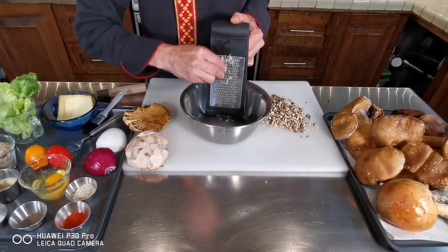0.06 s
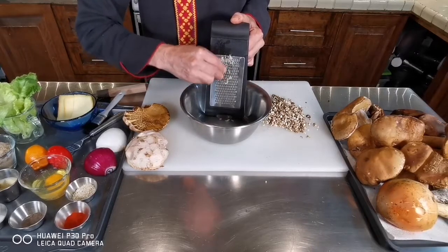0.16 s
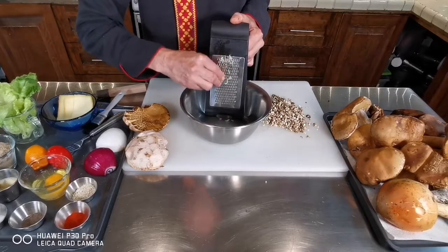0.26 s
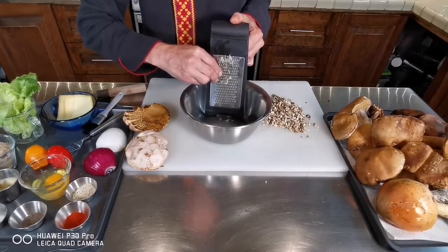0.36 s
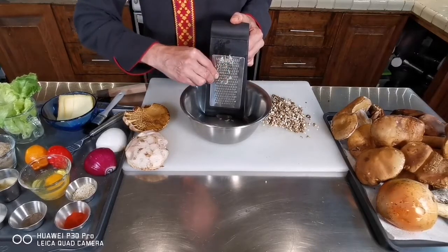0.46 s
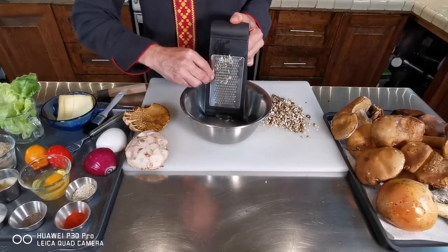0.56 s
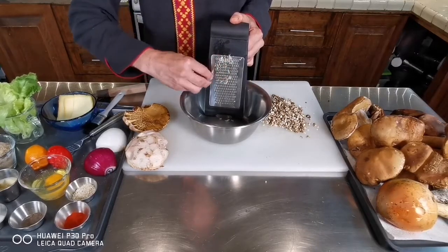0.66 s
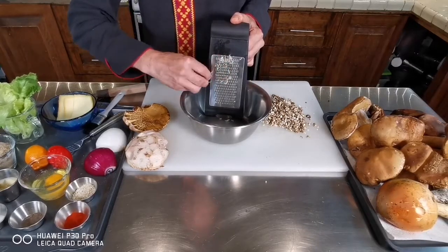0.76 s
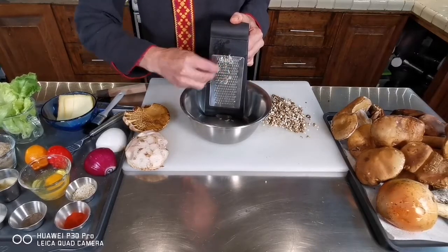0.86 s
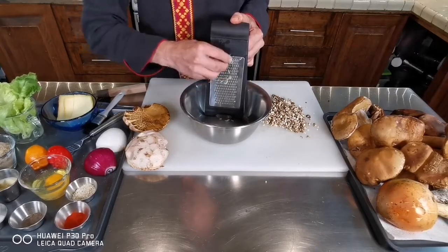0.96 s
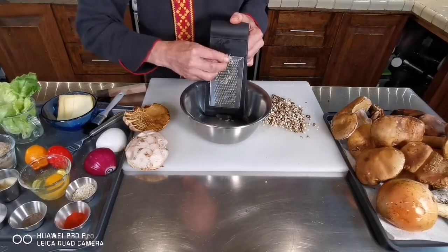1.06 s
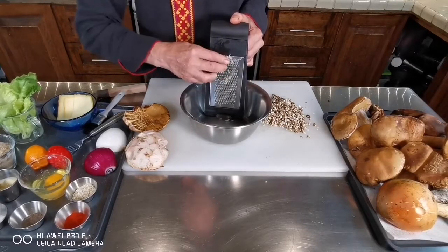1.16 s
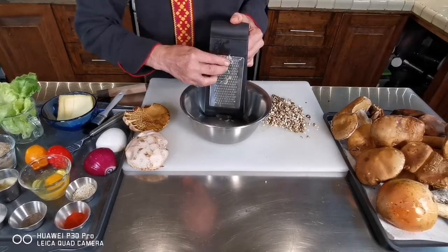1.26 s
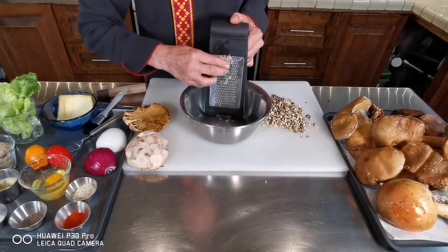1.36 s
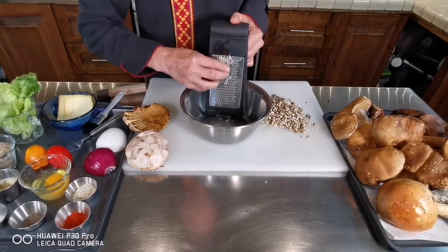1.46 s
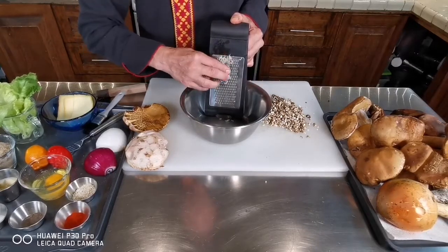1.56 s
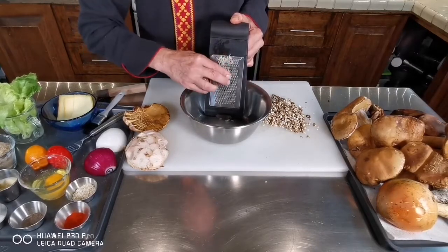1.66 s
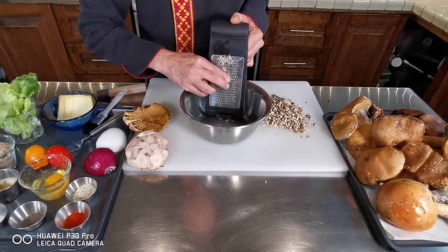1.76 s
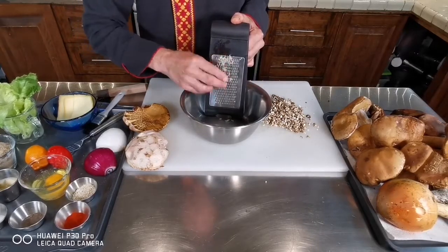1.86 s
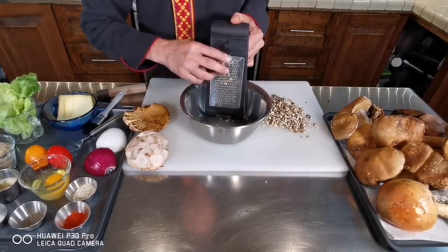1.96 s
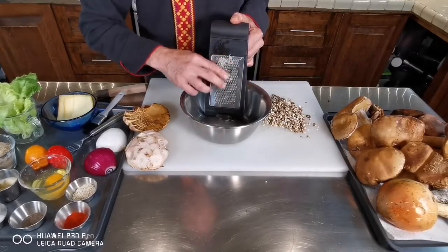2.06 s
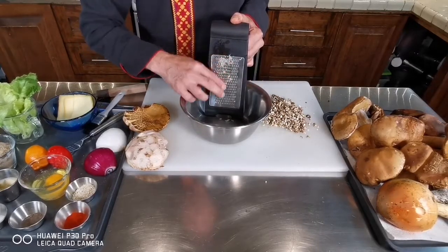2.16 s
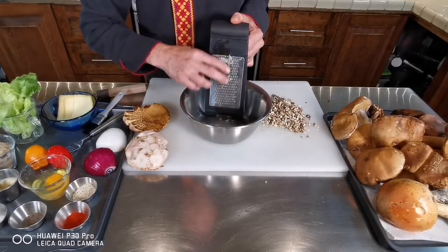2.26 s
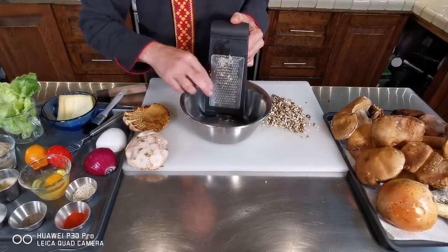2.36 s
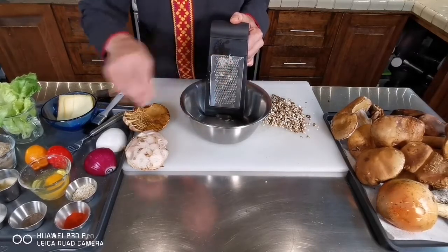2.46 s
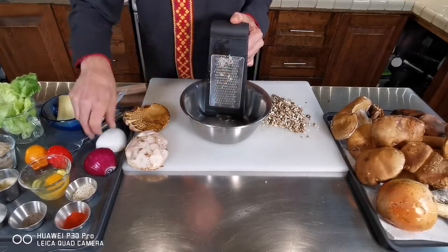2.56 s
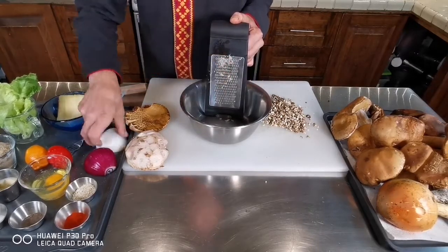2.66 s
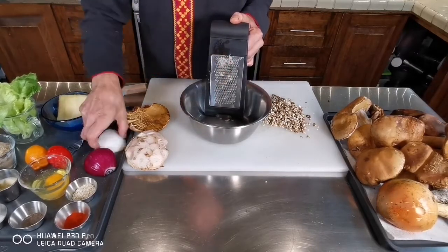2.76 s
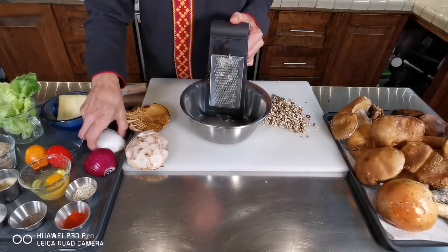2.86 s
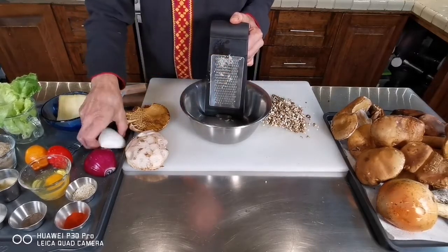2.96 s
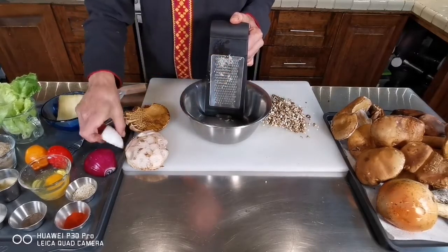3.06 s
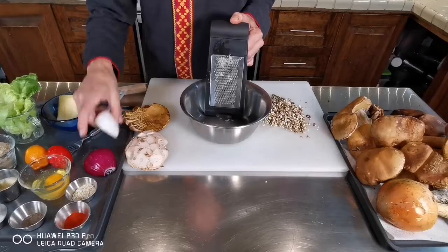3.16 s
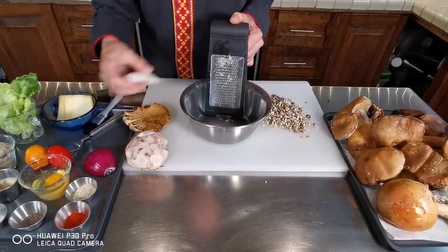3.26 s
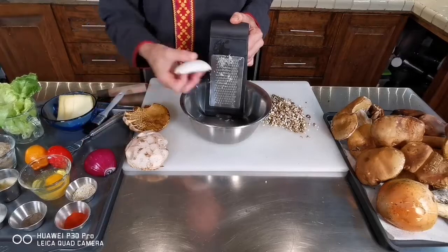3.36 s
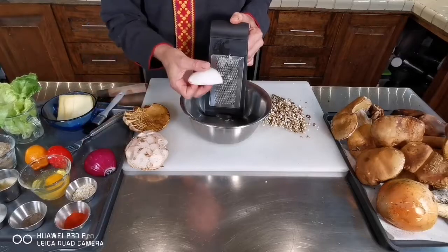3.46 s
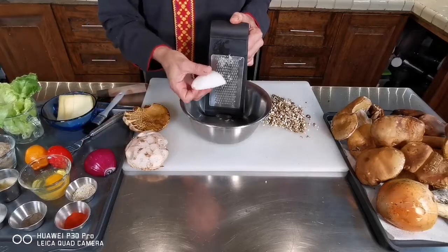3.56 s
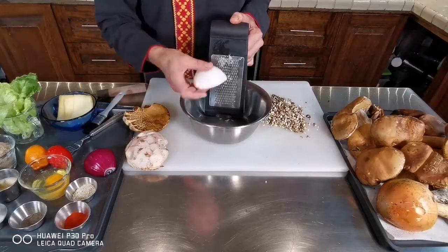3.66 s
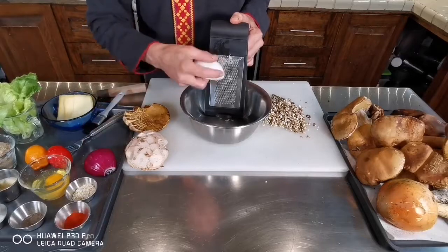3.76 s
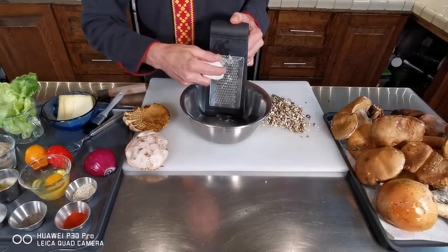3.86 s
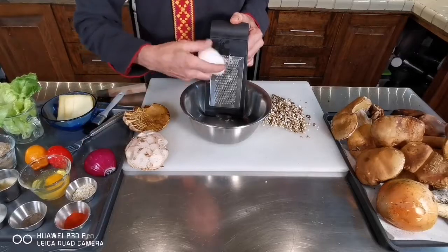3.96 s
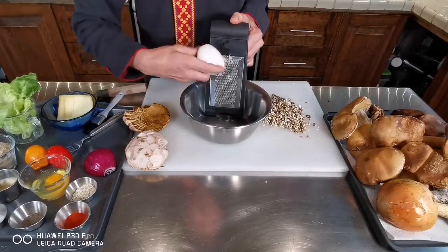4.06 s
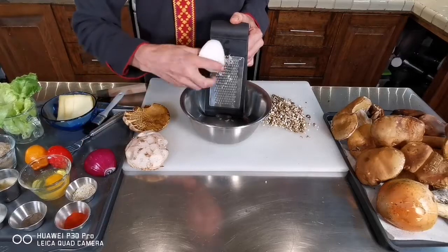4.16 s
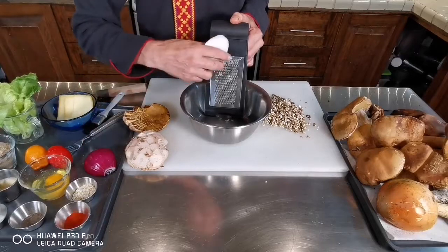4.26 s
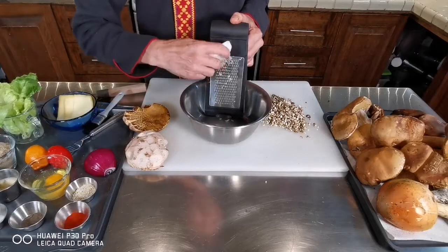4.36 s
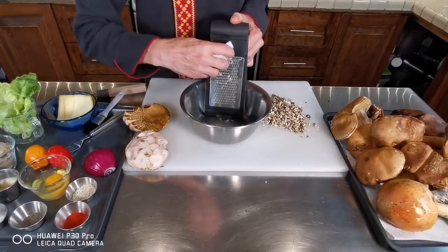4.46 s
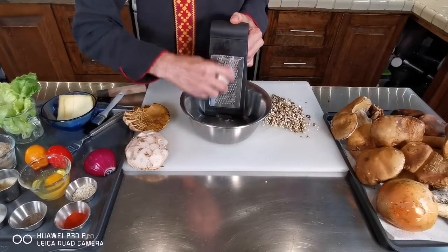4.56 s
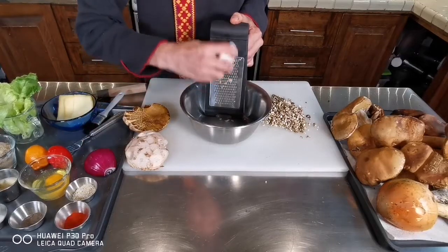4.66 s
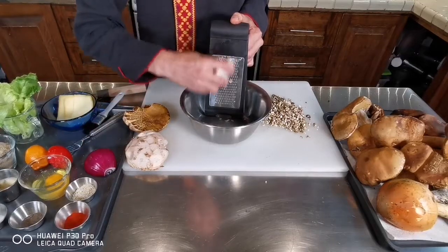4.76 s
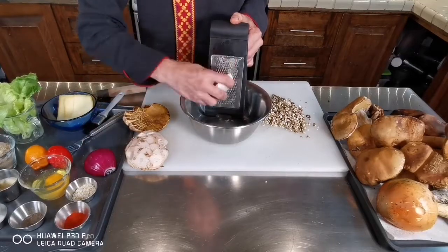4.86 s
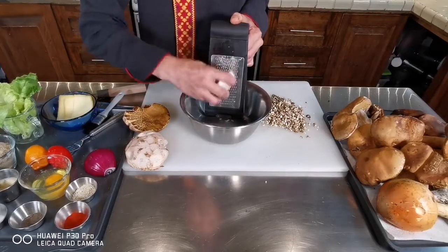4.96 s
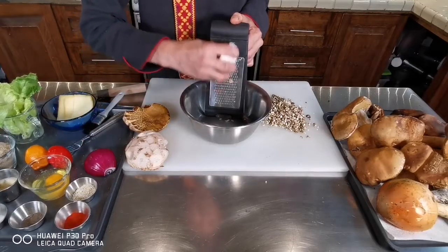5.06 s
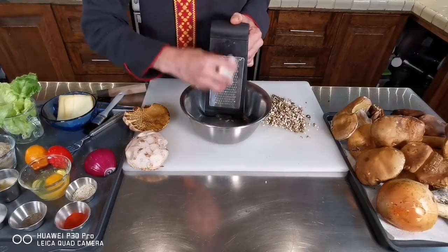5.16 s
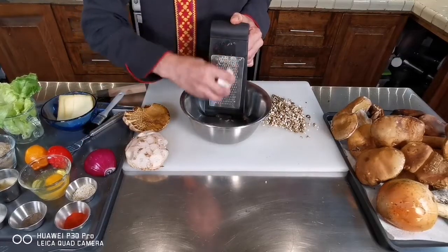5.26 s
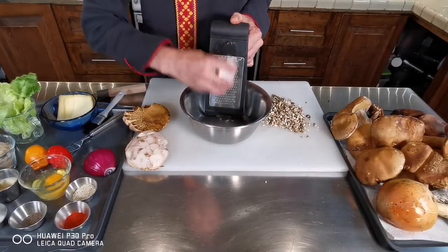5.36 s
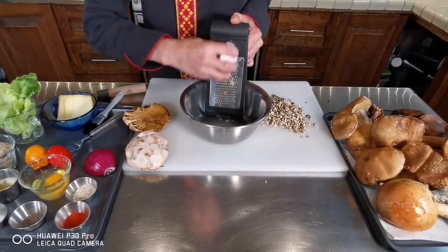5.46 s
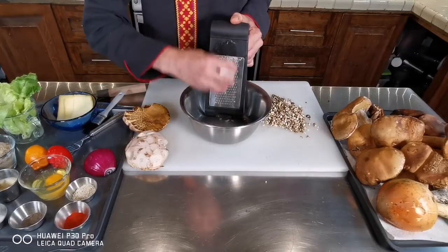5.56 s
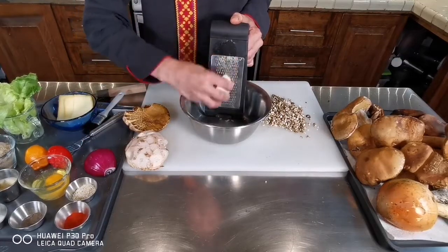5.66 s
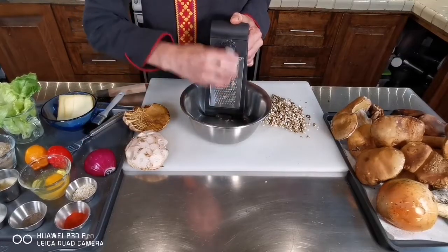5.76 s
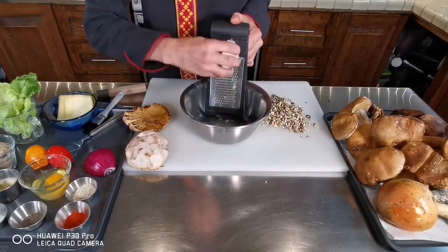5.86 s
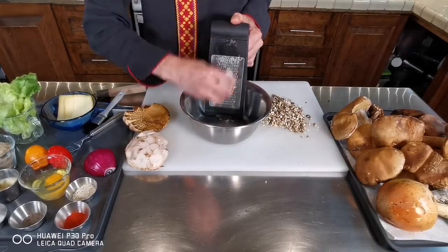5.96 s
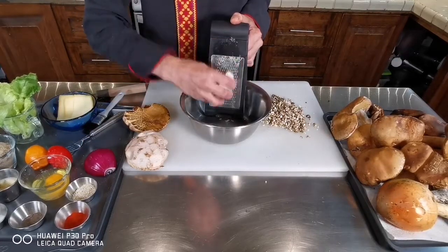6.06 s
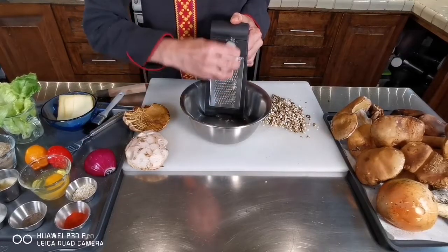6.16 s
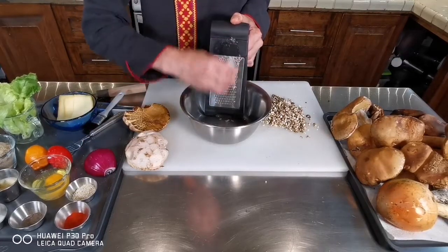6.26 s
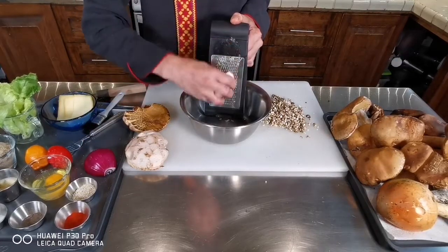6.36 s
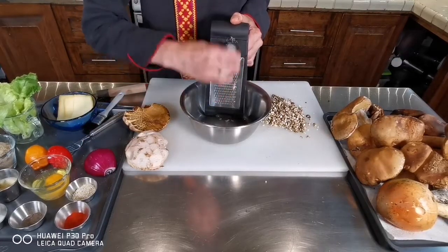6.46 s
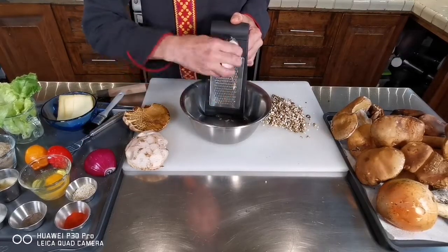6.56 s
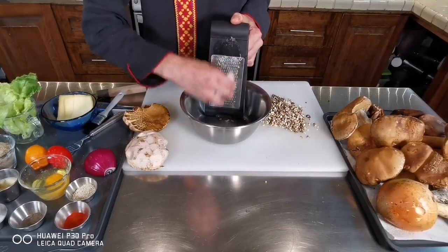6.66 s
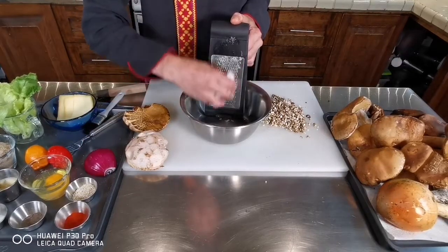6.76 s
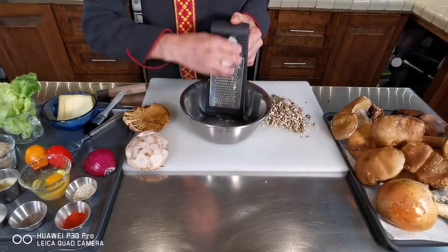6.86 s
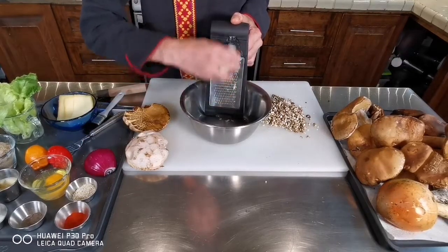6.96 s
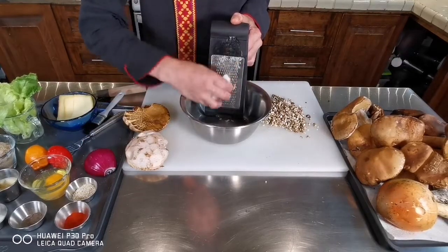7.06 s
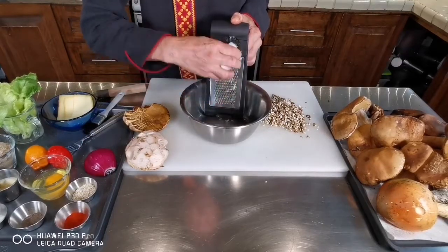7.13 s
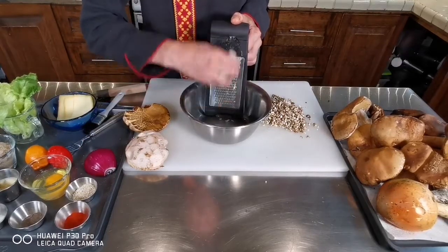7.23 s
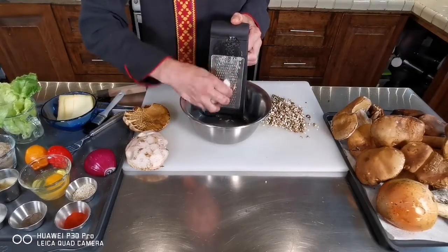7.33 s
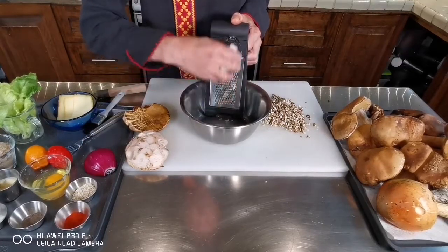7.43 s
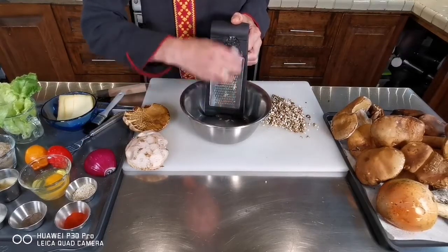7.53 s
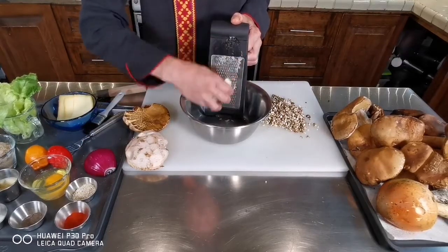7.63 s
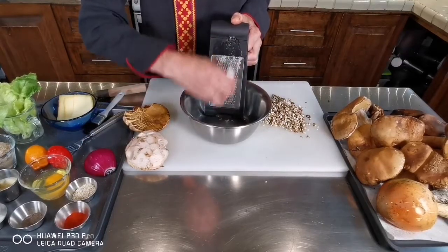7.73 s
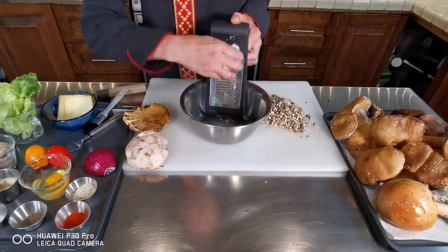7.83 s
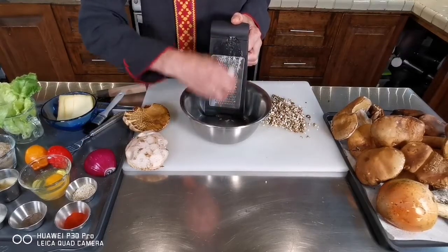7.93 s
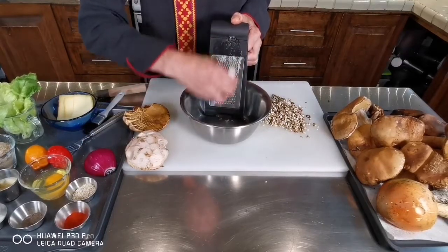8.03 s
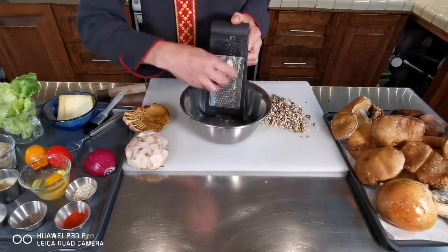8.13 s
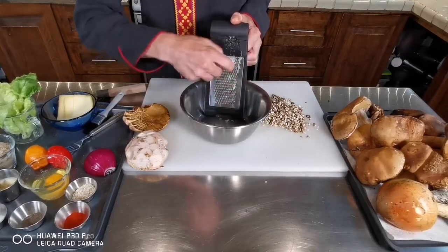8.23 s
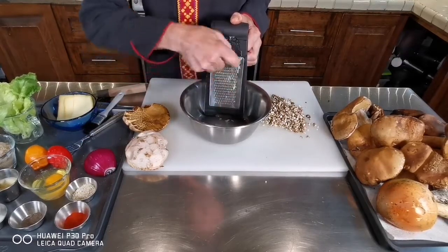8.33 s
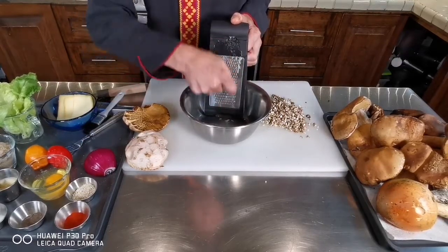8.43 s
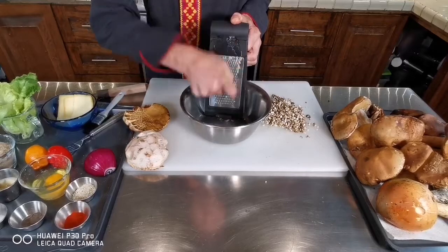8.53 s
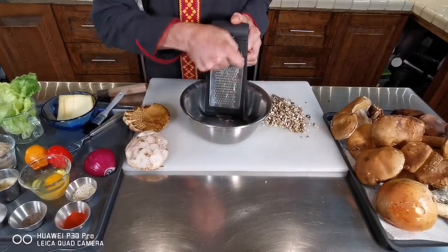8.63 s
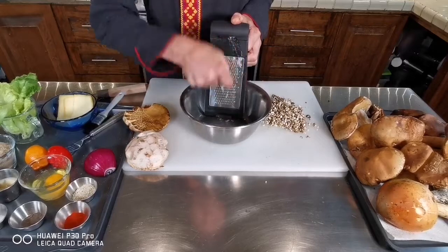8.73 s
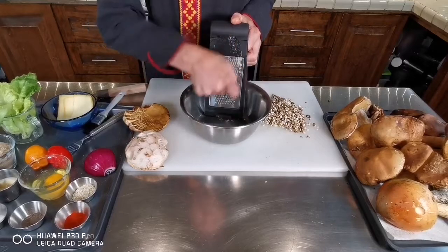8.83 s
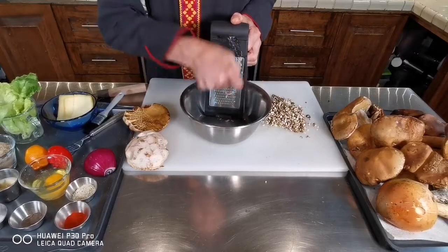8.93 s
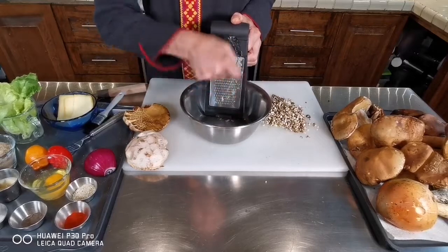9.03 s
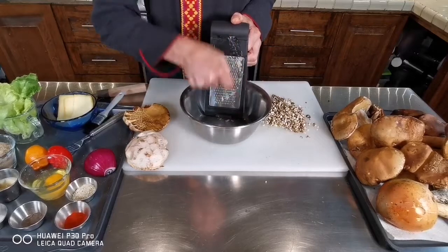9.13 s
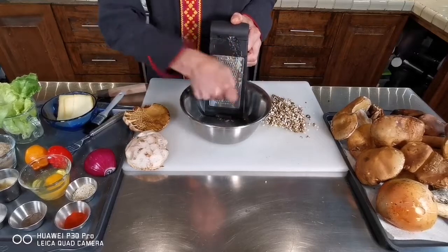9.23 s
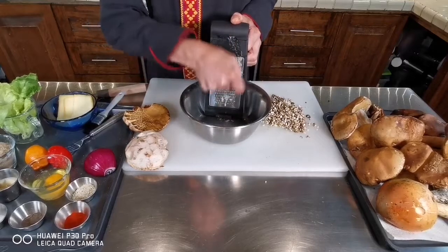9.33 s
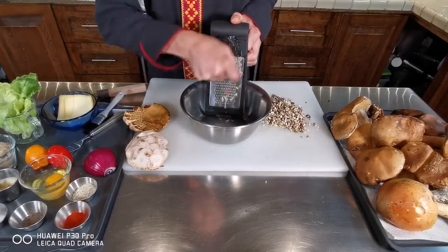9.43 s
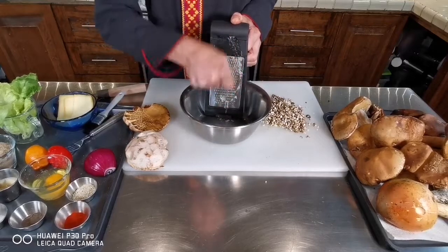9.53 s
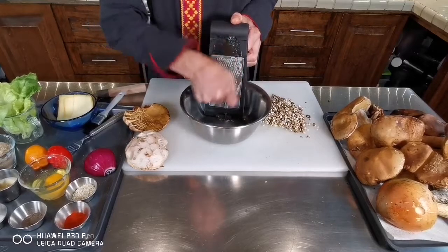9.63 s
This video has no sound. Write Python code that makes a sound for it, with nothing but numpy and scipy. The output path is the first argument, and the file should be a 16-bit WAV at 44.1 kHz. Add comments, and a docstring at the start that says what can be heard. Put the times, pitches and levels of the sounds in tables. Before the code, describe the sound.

In a small kitchen, a last scrap is rubbed in quick faint strokes on a steel grater in a bowl, then fingers wipe and pick the teeth with damped metallic ticks and hiss. A boiled egg scuffs and thuds softly on a tray. After a lull, rapid rasping strokes run to the end, with one short break. Close stereo microphones, low room hum, faint dishwasher swish early.

```python
"""A scrap is rubbed on a steel box grater in a steel bowl on a board; a faint dishwasher swishes by at first.
Fingers wipe and pick the teeth: damped walls ring under a hiss. A boiled egg scuffs its tray, which thuds.
The egg rubs lightly a few times, then is grated in about seven strokes a second, with a short break late on.
Random impulses, shaped by contact force, drive sheet colours and wall modes as the grating sound.
The drag drives low modes of worktop, grater and bowl, plus a wavering chatter; noise makes the room tone."""
import sys
import numpy as np
from scipy import signal
from scipy.fft import rfft, irfft
from scipy.io import wavfile

SR = 44100
rng = np.random.default_rng(int(sys.argv[2]) if len(sys.argv) > 2 else 0)


def store_wav(level_fs):
    """Save 16-bit WAV to argv[1]."""
    pcm = np.round(np.clip(np.atleast_2d(level_fs), -1, 1) * 32767)
    wavfile.write(sys.argv[1], SR, pcm.T.astype(np.int16))


N = 427329
T = np.arange(N) / SR

# All table levels are relative, ahead of the mix gains.
# egg strokes: [start t/s, rise to hardest moment t/s, push level/dB]
EGG_STROKES = [(4.546, 0.076, -41), (4.72, 0.035, -35.5), (4.878, 0.012, -37), (5.014, 0.038, -39.5),
               (5.152, 0.038, -37), (5.284, 0.04, -38.5), (5.418, 0.036, -39.5), (5.551, 0.027, -36.5),
               (5.694, 0.046, -41), (5.833, 0.035, -39.5), (5.968, 0.041, -40), (6.105, 0.035, -40),
               (6.246, 0.034, -41.5), (6.377, 0.051, -39.5), (6.523, 0.037, -39.5), (6.652, 0.053, -39.5),
               (6.797, 0.04, -41.5), (6.923, 0.055, -38.5), (7.067, 0.052, -40), (7.204, 0.048, -40.5),
               (7.339, 0.06, -42.5), (7.492, .038, -41), (7.634, 0.043, -41.5), (7.773, 0.026, -42),
               (7.905, 0.041, -43), (8.051, 0.045, -42.5), (8.43, 0.039, -38.5), (8.582, 0.03, -35.5),
               (8.732, .02, -38), (8.868, .025, -41), (9.006, 0.016, -39), (9.14, 0.02, -39.5),
               (9.271, .024, -40), (9.389, 0.037, -43), (9.531, 0.013, -41.5), (9.669, 0.0084, -41.5)]
# single short rubs of scrap or egg on the teeth: [start t/s, length t/s, level/dB, body re rub level/dB]
SHORT_RUBS = [(-.02, 0.075, -51, -4), (0.049, 0.063, -53, -3.5), (.103, 0.055, -49.5, -8.5),
              (0.155, 0.075, -56.5, -12), (0.229, 0.048, -51.5, -5.5), (0.274, 0.092, -53.5, 5),
              (2.367, 0.06, -56.5, -18), (3.835, .075, -76, -4), (3.986, 0.085, -75, -7),
              (4.114, 0.093, -68.5, -12), (8.13, 0.096, -68, 0), (8.342, 0.13, -66, -8)]
# single teeth that snag and let go: [t/s, wall ring level/dB, crisp tick level/dB]
TOOTH_SNAGS = [(0.018, -55, -54), (.128, -49.5, -51), (.296, -43, -50), (.331, -45.5, -66),
               (.657, -51.5, -62), (1.137, -70, -50.5), (1.384, -64, -53), (1.436, -68, -49),
               (1.503, -52, -46), (1.539, -49, -47), (2.383, -50.5, -59), (3.997, -67, -66),
               (4.211, -83, -63.5), (4.544, -68, -52), (8.276, -60.5, -54)]
# egg sliding and rolling on the tray: [start t/s, length t/s, scuff level/dB, thud level/dB]
EGG_SLIDES = [(2.725, .035, -59.5, -56), (2.74, .11, -65.5, -59.5), (2.933, 0.13, -77, -70),
              (3.01, 0.04, -65, -66), (3.04, 0.082, -66.5, -60)]
# fingers wiping crumbs off the teeth: [start t/s, length t/s, wall ring level/dB, hiss level/dB]
FINGER_WIPES = [(0.678, 0.048, -63, -84), (0.713, 0.46, -82, -81), (1.146, 0.065, -94, -66),
                (1.194, .08, -67.5, -59), (1.296, 0.084, -80, -65), (1.374, 0.1, -64.5, -53),
                (1.503, 0.098, -64.5, -53), (1.69, .057, -72, -68), (1.83, 0.13, -76, -80),
                (2.108, .095, -60.5, -63.5), (2.202, 0.09, -60, -65)]
# level of each kind of ring: [t/s, worktop level/dB, rocking level/dB, bowl level/dB, wall level/dB]
RING_LEVELS = [(0, -6, 2, -3, 0.5), (2.4, -6, 4.5, -2.5, 6), (4.8, -8, 4, -2, -1), (5.6, -7.5, -2, 1, -0.5),
               (6.8, 2, 0, -1.5, 2.5), (7.7, 4.5, -1, 1.5, 3), (8.6, 0, -3.5, 3.5, -3.5),
               (9.7, -3, -1, 2, -7)]
# drift of the grating: [t/s, return stroke level/dB, body re return level/dB, brightness/1]
GRATING_DRIFT = [(4.6, -45.5, -7.5, .5), (5.9, -47, -0.5, -1.5), (7.1, -46, -5, 0.7),
                 (7.9, -50, -7.5, -1.5), (8.5, -44.3, -4, -1), (9.6, -45.5, -0.5, -3)]
# sheet steel at the left and right microphone: [f/Hz, level/dB]
SHEET_LEFT = [(300, -18), (520, -6), (740, -3.5), (960, -12.5), (1300, -2), (1800, 0), (2700, -1),
              (3600, -1), (4900, 0), (5700, -3), (9000, -6), (10500, -11), (15500, -15)]
SHEET_RIGHT = [(300, -15), (520, -1.5), (680, 3.5), (960, -10.5), (1300, -5), (1750, 0.5), (2700, 2.5),
               (3600, -4), (5300, -1), (6900, -0.5), (7700, -7), (10700, -2.5), (11600, -7.5),
               (15500, -8.5)]
# egg on the tray: [f/Hz, level/dB]
TRAY_COLOUR = [(150, -5), (400, 5), (620, -4.5), (880, 10), (1100, -1.5), (1500, -2.5), (2600, -6),
               (5500, -10), (9000, -22), (15000, -21)]
# steady room tone: [f/Hz, level/dB]
ROOM_COLOUR = [(20, -0.5), (40, 3.5), (56, 8), (80, -8), (120, -1.5), (170, -7), (260, -11), (500, -17.5),
               (1000, -25.5), (2500, -30.5), (6000, -35), (11000, -35), (15500, -36)]
# dishwasher spray: [f/Hz, level/dB]
SPRAY_COLOUR = [(150, -31), (300, -13.5), (370, 10), (420, 2), (490, -23), (900, -30), (2000, -31)]
# skin and crumbs hissing over the teeth: [f/Hz, level/dB]
HISS_COLOUR = [(800, -18), (2500, -4), (3600, -6), (5300, 0), (7000, 1), (8500, -2), (10800, -1),
               (15500, -1)]
# free grater walls: [f/Hz, width f/Hz, level/dB]
FREE_WALL_MODES = [(1207, 67, -8), (1632, 48, -6.5), (1775, 130, -6.5), (1887, 68, -5), (2210, 52, -3.5),
                   (2312, 62, 0), (2670, 60, -3.5), (4710, 67, -12), (4924, 90, -5.5), (5280, 98, -4)]
# walls damped by fingers: [f/Hz, width f/Hz, level/dB]
DAMPED_WALL_MODES = [(606, 89, -5), (1225, 71, -0.5), (1350, 60, -2.5), (1610, 96, 3), (1826, 120, -2),
                     (2370, 320, -1.5), (2850, 67, -4.5)]
# thin ring under a dry scrap: [f/Hz, width f/Hz, level/dB]
TOOTH_SING_MODES = [(1864, 65, -3), (5400, 70, 0), (10750, 270, -13)]
# worktop: [f/Hz, width f/Hz, level/dB]
TABLE_MODES = [(40, 19, -2.5), (90, 21, -5)]
# grater rocking: [f/Hz, width f/Hz, level/dB]
ROCKING_MODES = [(159.2, 20.6, 0), (195, 38, -1.5), (225.8, 22, -1.5)]
# bowl knocking on the board: [f/Hz, width f/Hz, level/dB]
BOWL_KNOCK_MODES = [(264.6, 23.6, 1), (299.3, 32, -1), (322, 28, -7), (384.4, 26, -3.5), (503.6, 53, -8),
                    (609, 82, -5), (724, 96, -8.5)]

# a slow rise lengthens the push; an abrupt one shakes the body more
PUSH_S, PUSH_STRETCH_S_PER_S = 0.069, 0.22
PUSH_BODY_DB, BODY_LOSS_DB_PER_S = -0.5, 123
# longest wait for the next push; scuff as the egg lifts off
REACH_S, LIFT_S, LIFT_DB = 0.2, 0.04, -14
# overlap of the return with the pushes on either side
RETURN_LEAD_S, RETURN_OVERLAP_S = 0.023, 0.0074
# share of a rub or wipe before its peak; brightness of rubs, unitless
RUB_PEAK, RUB_BRIGHTNESS = 0.34, 1.7
# body drag of a wipe: level at 0 dB wall ring, dB per dB
WIPE_BODY_DB, WIPE_BODY_SLOPE = -35, 0.41
CRUMB_SPAN_S, CRUMB_RING_DB, CRUMB_TICK_DB = (0.67, 1.35), -70, -67
# drag at which chatter is proportional to drag alone; extra dB per dB
CHATTER_DRAG_DB, CHATTER_GROWTH = -47, 0.34
TOP_HZ = 15850


def undb(db):
    """Decibels to amplitude gain."""
    return 10 ** (np.asarray(db) / 20)


def unit(h):
    """Scale a response to unit energy, averaged over its rows."""
    return h / np.sqrt(np.sum(h ** 2, axis=-1, keepdims=True).mean())


def through(x, h):
    """Convolve a signal with a response, one row per microphone."""
    return signal.oaconvolve(np.atleast_2d(x), np.atleast_2d(h), axes=-1)[:, :N]


def colour(points, size=4096):
    """Minimum-phase response with the given spectral outline."""
    hz, db = np.transpose(points)
    grid_hz = np.maximum(np.fft.rfftfreq(size, 1 / SR), 1)
    outline_db = np.interp(np.log(grid_hz), np.log(hz), db)
    cepstrum = irfft(np.log(undb(outline_db)))
    # fold to the causal side
    cepstrum[1:size // 2] *= 2
    cepstrum[size // 2 + 1:] = 0
    return irfft(np.exp(rfft(cepstrum)))


def ring(modes, size=8192):
    """Sum of damped modes, energy per mode from its level, sign random."""
    t = T[:size]
    total = np.zeros(size)
    for hz, width_hz, db in modes:
        mode = np.exp(-np.pi * width_hz * t) * np.sin(2 * np.pi * hz * t)
        total += rng.choice([-1, 1]) * undb(db) * unit(mode)
    return unit(total)


def tail(t60_s, size=16384):
    """Dense noise decay, independent at each microphone."""
    decay = np.exp(-np.log(1000) * T[:size] / t60_s)
    return unit(rng.standard_normal((2, size)) * decay)


def low(x, hz, order=2):
    """Butterworth low-pass."""
    return signal.sosfilt(signal.butter(order, hz, fs=SR, output="sos"), x)


def split(x, hz):
    """Part a sound into lows and highs whose powers add up to the whole."""
    lows = low(x, hz, order=1)
    return lows, x - lows


def walk(rate_hz):
    """Random level with spread 1, linear between knots at the given rate."""
    knots = rng.standard_normal(N // 40)
    w = np.interp(T * rate_hz, np.arange(N // 40), knots)
    return w / w.std()


def catches(rate_hz, spread_db):
    """Random tiny impulses of uneven size, rms 1."""
    x = np.zeros(N)
    when = np.flatnonzero(rng.random(N) < rate_hz / SR)
    size, sign = rng.standard_normal((2, len(when)))
    x[when] = np.sign(sign) * undb(spread_db * np.clip(size, -2, 2))
    return x / x.std()


def tracks(table):
    """Table columns after the first, interpolated over time."""
    times, *columns = np.transpose(table)
    return [np.interp(T, times, column) for column in columns]


def swell(start, hardest, end):
    """Contact force of one pass: grows to the hardest moment, dies at the end."""
    force = np.zeros(N)
    span = slice(*np.searchsorted(T, [start, end]))
    phase = np.interp(T[span], [start, hardest, end], [0, 1, 2])
    force[span] = np.sin(np.pi / 2 * phase)
    return force


def rub(start, length):
    """Contact force of one rub, wipe or slide, hardest at a fixed share of its length."""
    return swell(start, start + RUB_PEAK * length, start + length)


def rubs_at(table, column):
    """Summed contact force of a table's rows, level from one column."""
    return sum(undb(row[column]) * rub(row[0], row[1]) for row in table)


def kitchen():
    """Room tone as coloured noise, and dishwasher spray swelling on every turn of its arm."""
    tone = unit(colour(ROOM_COLOUR))
    # lows shared by both microphones, highs independent
    shared, _ = split(through(rng.standard_normal(N), tone), 730)
    _, apart = split(through(rng.standard_normal((2, N)), tone), 670)
    running_db = np.interp(T, [0, 3, 4.3, 8.3], [-66.0, -67.5, -70.5, -69.0])
    shared = shared * undb(running_db + 0.93 * walk(6)) * undb([[1], [-1]])
    arm = (1 + np.cos(2 * np.pi * (T - 0.63) / 0.791)) / 2  # turn 0.791 s
    spray_db = np.interp(T, [0.6, 1.4, 3, 3.8], [-70, -69.0, -70.0, -76])
    spray = through(rng.standard_normal(N), unit(colour(SPRAY_COLOUR)))
    return shared + apart * undb(-61.5) + spray * arm ** 1.85 * undb(spray_db)


def egg():
    """The egg scuffs the tray in tiny catches; noise under the contact force thuds in two low modes."""
    scuff = catches(rate_hz=1100, spread_db=5.5) * rubs_at(EGG_SLIDES, 2)
    sound = through(scuff, unit(colour(TRAY_COLOUR)))
    sound = sound + undb(3.0) * through(sound, tail(0.039))
    press = rng.standard_normal(N) * rubs_at(EGG_SLIDES, 3)
    thud = through(press, ring([(120, 30, -3.5), (216, 21, 3)]))  # f/Hz, width f/Hz, level/dB
    return undb([[-1], [0]]) * sound + undb(-2.5) * thud


def spot(size=4096):
    """Response of one place on the sheet: lows alike at both microphones, treble scattered."""
    direct, _ = split(signal.unit_impulse(size), 2440)
    diffuse = undb(-4.5) * tail(0.0076, size=size) + undb(-1.5) * tail(0.083, size=size)
    _, scatter = split(diffuse, 1600)
    return unit(undb(1.5) * direct + scatter)


def snags(count=5):
    """Decaying envelopes (wall ring, tick) of teeth letting go and of crumbs at random times."""
    envelopes = np.zeros((2, N))
    crumbs = [(start, CRUMB_RING_DB, CRUMB_TICK_DB) for start in rng.uniform(*CRUMB_SPAN_S, count)]
    decay = np.exp(-T[:SR // 40] / 0.0021)
    for start, *levels_db in list(TOOTH_SNAGS) + crumbs:
        first = int(start * SR)
        envelopes[:, first:first + SR // 40] += undb(levels_db)[:, None] * decay
    return envelopes


def fingers():
    """Wipes and snags: finger-damped walls ring briefly under a fine hiss."""
    crack, tick = snags()
    force = catches(rate_hz=1200, spread_db=5.0) * rubs_at(FINGER_WIPES, 2)
    force += undb(3) * crack * rng.standard_normal(N)
    # part of every touch spreads over the whole sheet
    sheet = through(through(force, spot()), unit(colour(SHEET_LEFT)))
    walls = through(force, ring(DAMPED_WALL_MODES)) + undb(-3.5) * sheet
    crumbs = catches(rate_hz=6000, spread_db=3) * rubs_at(FINGER_WIPES, 3)
    crumbs += undb(3.5) * tick * rng.standard_normal(N)
    scattered = through(crumbs, unit(tail(0.004) + undb(-7) * tail(0.05)))
    hiss = through(scattered, unit(colour(HISS_COLOUR)))
    return walls * undb([[-3], [1]]) + hiss * undb([[-2.5], [1.5]])


def chatter(drag):
    """Stick-slip locked onto the grater's rocking: a wavering tone that outgrows the drag."""
    hz = 229 * (1 + 0.03506 * walk(30))
    growth = (drag / undb(CHATTER_DRAG_DB)) ** CHATTER_GROWTH
    level = low(drag * growth, 34) * undb(2.2 * walk(30))
    return np.sin(2 * np.pi * np.cumsum(hz) / SR) * level


def drone(drag, worktop_db, rock_db, bowl_db):
    """The drag shakes worktop, grater and bowl in their low modes."""
    levels_db = (worktop_db, rock_db, bowl_db)
    shakes = [catches(rate_hz=900, spread_db=2.5) * drag * undb(db) for db in levels_db]
    worktop = through(shakes[0], ring(TABLE_MODES)) * undb(-10.5)
    rock = through(shakes[1], ring(ROCKING_MODES)) * undb(-6.0)
    rock = rock + chatter(drag) * undb(rock_db - 1.5)
    # each microphone hears part of the bowl from its own side
    sides = np.array([ring(BOWL_KNOCK_MODES), ring(BOWL_KNOCK_MODES)])
    bowl_ring = unit(ring(BOWL_KNOCK_MODES) + undb(-16.5) * np.roll(sides, 40, axis=-1))
    bowl = through(shakes[2], bowl_ring) * undb(-5)
    return (worktop + rock) * undb([[0.7], [-0.7]]) + bowl * undb([[-0.2], [0.2]])


def hand():
    """Rasp strength, body drive and brightness over time; contact powers of strokes and rubs add."""
    push, bite, back = np.zeros((3, N))
    next_starts = [row[0] for row in EGG_STROKES[1:]] + [np.inf]
    for (start, rise, db), following in zip(EGG_STROKES, next_starts):
        turn = start + PUSH_S + PUSH_STRETCH_S_PER_S * rise
        hardest = min(start + rise, turn)
        push += (undb(db) * swell(start, hardest, turn)) ** 2
        # drag peaks before the push does, while the food bites
        bite_db = db + PUSH_BODY_DB - BODY_LOSS_DB_PER_S * rise
        bite_peak = start + 0.88 * (hardest - start)
        bite += (undb(bite_db) * swell(start, bite_peak, turn)) ** 2
        # the food slides back over the blunt sides of the teeth, or lifts off
        if following - start < REACH_S:
            end, weight = following, 1
        else:
            end, weight = turn + LIFT_S, undb(LIFT_DB)
        slide = swell(turn - RETURN_LEAD_S, (turn + end) / 2, end + RETURN_OVERLAP_S)
        back += (weight * slide) ** 2
    back_db, back_body_db, brightness = tracks(GRATING_DRIFT)
    back = back * undb(back_db) ** 2
    rubs, rub_drag = np.zeros((2, N))
    for start, length, db, body_db in SHORT_RUBS:
        rubs += (undb(db) * rub(start, length)) ** 2
        rub_drag += (undb(db + body_db) * rub(start, length)) ** 2
    rasp = push + back + rubs
    body = bite + back * undb(back_body_db) ** 2 + rub_drag
    bright = push * brightness + back * (brightness + 0.19) + rubs * RUB_BRIGHTNESS
    return np.sqrt(rasp), np.sqrt(body), bright / (rasp + 1e-14)


def tilt(x, brightness):
    """Sharper catches move energy to the treble: 2.4 dB of high-band gain per unit."""
    dull = low(x, 5100, order=1)
    gain = undb(2.4 * brightness)
    return (dull + gain * (x - dull)) / np.sqrt((1 + gain ** 2) / 2)


def grater(rasp, brightness, wall_db, count=7):
    """Teeth grip and slip at many spots; the sheet colours each catch and the walls ring."""
    grip = undb(1.3 * walk(110) + 0.87 * walk(600))
    force = catches(rate_hz=6000, spread_db=4.0) * rasp * grip
    # contact wanders over the sheet, so the colour varies
    place = np.floor(2.5 * walk(14) + 4 * rng.random(N)) % count
    sheet = sum(through(force * (place == k), spot()) for k in range(count))
    sheet = tilt(sheet, brightness + 1.5)
    steel = through(sheet, unit(np.array([colour(SHEET_LEFT), colour(SHEET_RIGHT)])))
    # each catch bends the walls in or out at random
    bend = force * rng.choice([-1, 1], N) * undb(wall_db - 0.39 * brightness)
    walls = through(bend, ring(FREE_WALL_MODES)) * undb([[-11], [-7]])
    # a dry scrap sets the teeth singing at the start
    dry_scrap = rng.standard_normal(N) * rasp * np.interp(T, [0.26, 0.4], [1, 0])
    sing = through(dry_scrap, ring(TOOTH_SING_MODES)) * undb([[-11], [-3]])
    return steel * undb(-0.58) + walls + sing


def scene():
    """Everything on the worktop, with the short echo of the cupboards."""
    rasp, drag, brightness = hand()
    for start, length, db, _ in FINGER_WIPES:
        drag = drag + undb(WIPE_BODY_DB + WIPE_BODY_SLOPE * db) * rub(start, length)
    worktop_db, rock_db, bowl_db, wall_db = tracks(RING_LEVELS)
    grating = grater(rasp, brightness, wall_db)
    left, right = egg() + fingers() + drone(drag, worktop_db, rock_db, bowl_db) + grating
    # sound reaches the right microphone two samples later
    near = np.array([left * undb(-0.17), np.roll(right, 2) * undb(-0.42)])
    # echo starts after 6 ms, its lows alike at both microphones
    lows, highs = split(tail(0.53) * (T[:16384] > 0.006), 480)
    echo_response = low(undb(-3.5) * lows[0] + highs, 15000, order=1)
    echo = through(near.mean(axis=0), echo_response)
    return near + undb(-9) * echo + kitchen()


def record(dry):
    """Band limits: gentle high-pass in the deepest bass, steep low-pass at TOP_HZ."""
    thin = signal.sosfilt(signal.butter(2, 22, "high", fs=SR, output="sos"), dry)
    return signal.sosfilt(signal.ellip(10, 0.1, 70, TOP_HZ, fs=SR, output="sos"), thin)


dry = scene()
out = record(dry)
store_wav(out)
```